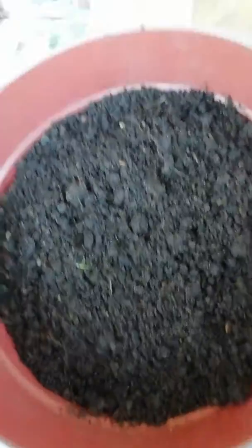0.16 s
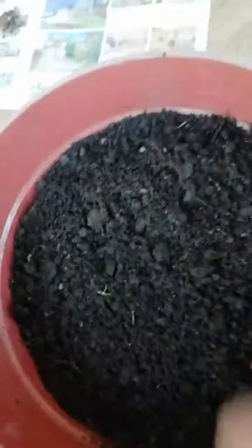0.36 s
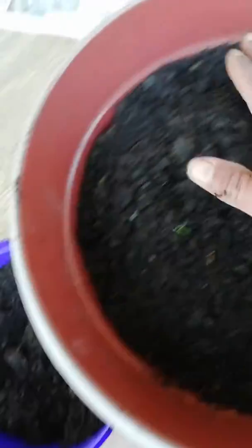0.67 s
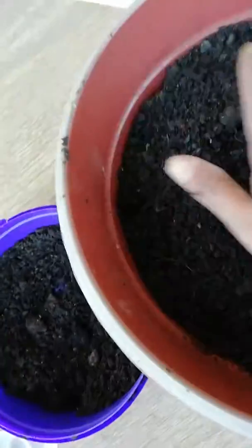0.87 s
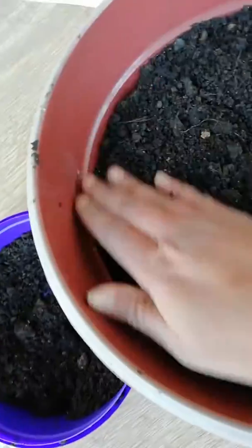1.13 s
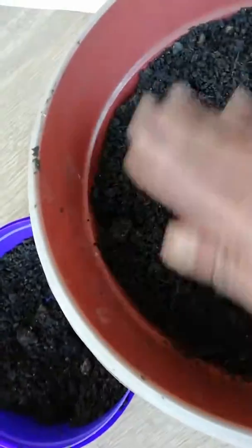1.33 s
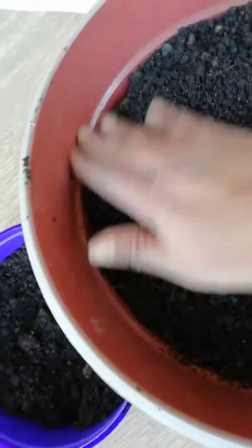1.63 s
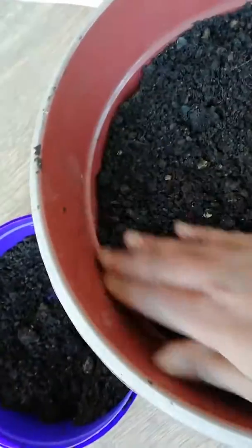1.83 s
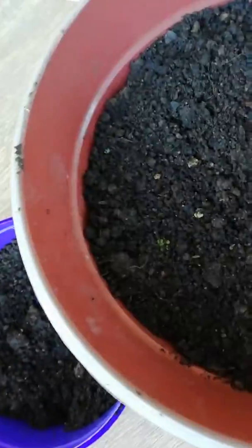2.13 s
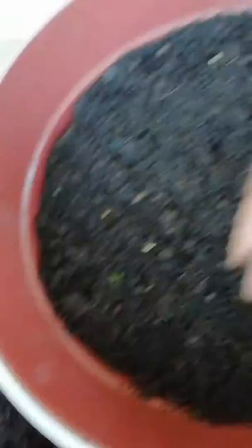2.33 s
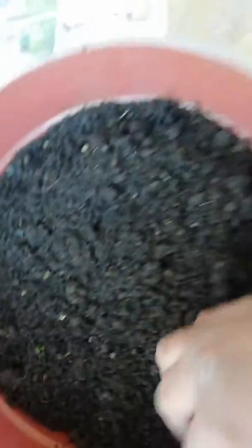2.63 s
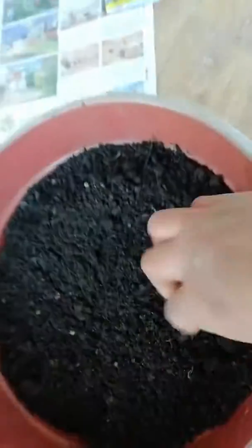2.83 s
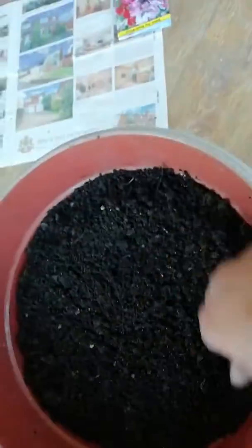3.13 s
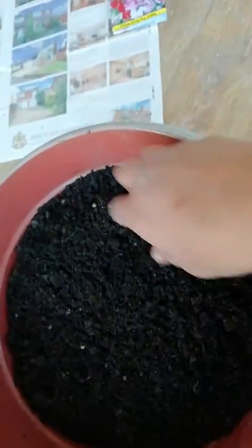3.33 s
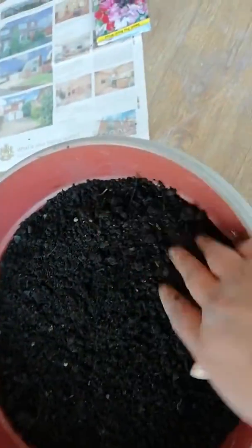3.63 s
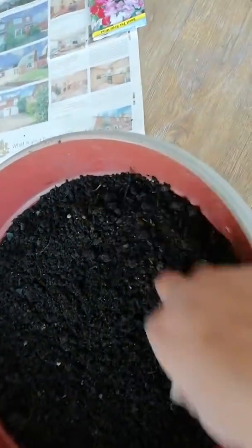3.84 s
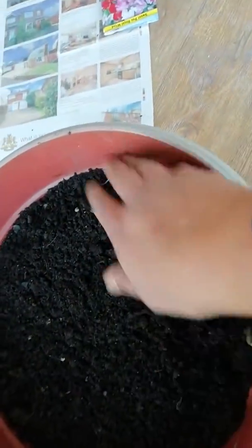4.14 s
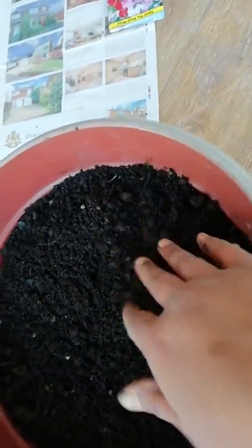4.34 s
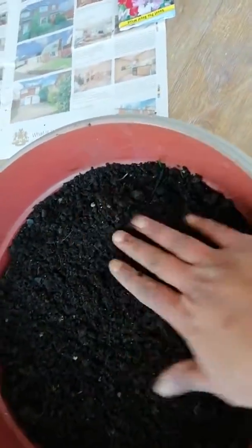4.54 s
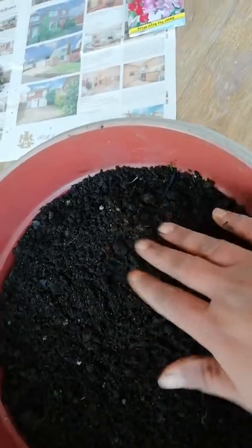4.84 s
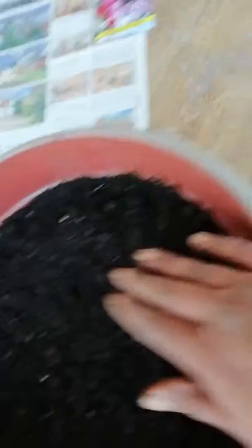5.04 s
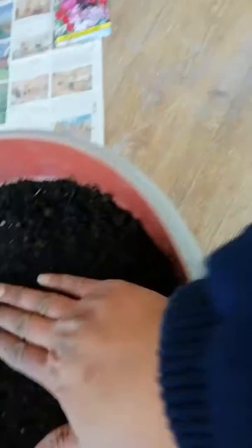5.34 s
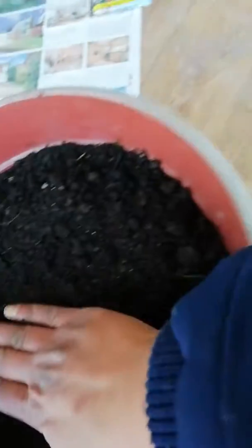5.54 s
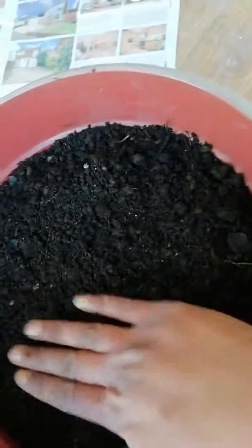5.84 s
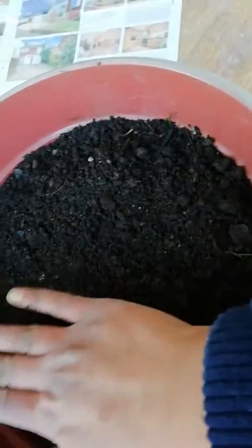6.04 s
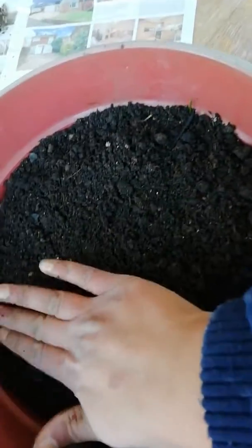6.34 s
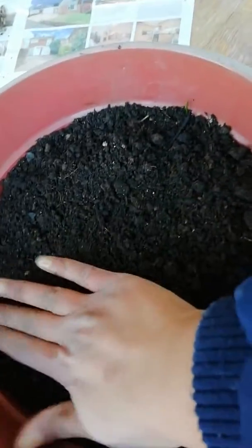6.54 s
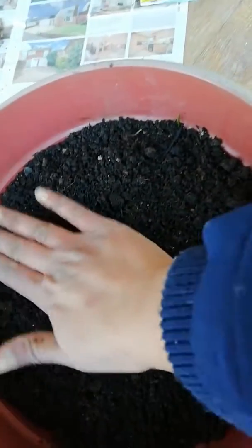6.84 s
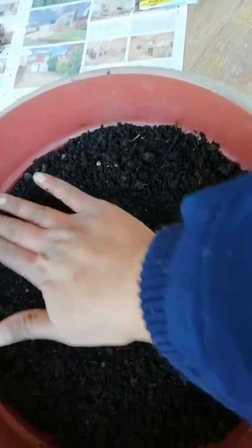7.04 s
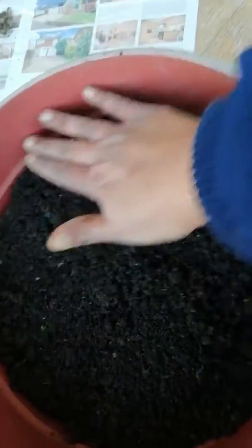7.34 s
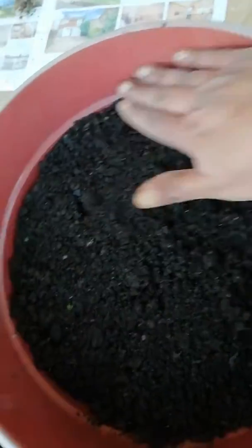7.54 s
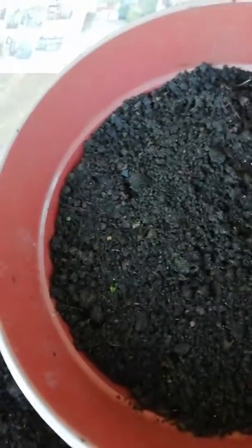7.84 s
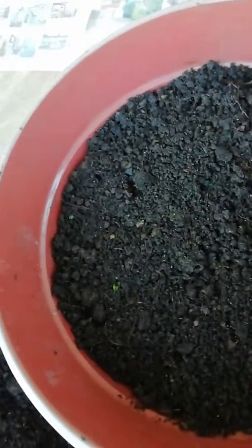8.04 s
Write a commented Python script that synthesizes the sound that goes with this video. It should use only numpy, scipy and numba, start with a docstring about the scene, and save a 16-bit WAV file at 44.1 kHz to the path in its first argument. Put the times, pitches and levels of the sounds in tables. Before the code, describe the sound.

Close up in a small quiet room, fingers sweep loose soil around a plastic pot with soft swishes, gritty wipes and tiny crumb ticks. Around three seconds a short scrape ends in a sharp plastic snap, by far the loudest moment. Fainter rustles follow, then the strokes strengthen near the end. A low engine-like hum wavers behind, over faint hiss.

```python
"""Hands level potting compost in a plastic pot, close to a phone's two microphones in a small room.
Fingers brush soil along the wall and a sleeve swishes: noise of tiny slips, filtered and shaped by strokes.
A gritty scrape ends in a snap of the plastic, a sum of damped modes; soft pats and crumb ticks are noise bursts.
Behind, harmonics make a low hum, like an engine outside, that rises and falls and briefly booms in the room.
Quiet room air, a wavering drone and a faint hiss lie beneath."""
import sys
import numpy as np
from scipy import signal
from scipy.fft import rfft, irfft, next_fast_len
from scipy.io import wavfile
from scipy.ndimage import uniform_filter1d
from numba import njit

SR = 44100
rng = np.random.default_rng(int(sys.argv[2]) if len(sys.argv) > 2 else 0)


def unload_wav(signal):
    """Save mono or channel-first audio to the path in sys.argv[1] as 16-bit WAV at rate SR, clipped to [-1, 1]."""
    wavfile.write(
        sys.argv[1],
        SR,
        np.round(np.clip(np.atleast_2d(signal).T, -1, 1) * 32767).astype(np.int16),
    )


N = 361179
T = np.arange(N) / SR  # time [s]


def amp(db):
    """Decibels to gain."""
    return 10 ** (np.asarray(db) / 20)


def curve(rows):
    """The columns of a table after its time column, joined by straight lines in time."""
    s, *columns = np.transpose(rows)
    return [np.interp(T, s, c) for c in columns]


def colour(x, points, share=1):
    """Filter by (frequency [Hz], level [dB]) points on a log-frequency axis, their decibels times share."""
    size = next_fast_len(N, real=True)
    hz, db = np.transpose(points)
    f = np.maximum(np.fft.rfftfreq(size, 1 / SR), 1)
    gain = amp(share * np.interp(np.log(f), np.log(hz), db))
    return irfft(rfft(x, size) * gain, size)[..., :N]


def band(x, lo_hz, hi_hz, order=3):
    """Band-pass."""
    edges = [lo_hz, min(hi_hz, SR / 2 - 1)]
    return signal.sosfilt(signal.butter(order, edges, "band", fs=SR, output="sos"), x)


def unit(x, lo_hz=20, hi_hz=16000):
    """Scale a stereo pair so that its middle has rms 1 in a band."""
    return x / band(x.mean(axis=0), lo_hz, hi_hz).std()


def walk(rate):
    """A smooth random wander with spread near 1, from about rate random points a second."""
    y = signal.resample(rng.standard_normal(int(rate * N / SR) + 2), 4096)
    return np.interp(T, np.linspace(0, T[-1], len(y)), y)


def ports(pair):
    """Each microphone port gives the sound its own colour."""
    # shape of the left-right difference, shared out below: (frequency [Hz], left minus right [dB])
    port_points = [(150, 12), (500, -4.5), (1000, -4), (2300, -8.5), (3800, -2.5), (5000, -7.5),
                   (6500, -20), (8000, -7.5), (10000, -2.5), (15000, 4.5)]
    return np.array([colour(pair[0], port_points, 0.58), colour(pair[1], port_points, -0.54)])


def add(out, pair, s, db):
    """Place a short stereo sound at a time, its middle peaking at the given level."""
    i = int(s * SR)
    scaled = amp(db) * pair / np.abs(pair.mean(axis=0)).max()
    out[:, i:i + pair.shape[1]] += scaled[:, :N - i]


def stroke(start_s, length_s, swell_db, attack_s, release_s):
    """Gain of one touch: it sets in, swells or eases while the hand travels, and dies away."""
    age = T - start_s
    onset = .5 + .5 * np.tanh(age / (2 * attack_s))
    travel = amp(swell_db * (np.clip(age / length_s, 0, 1) - .5))
    return onset * travel * np.exp(-np.clip((age - length_s) / release_s, 0, 20))


def strokes(rows, attack_s, release_s):
    """Gains of all touches in a table: the main layer, then the layers set relative to it."""
    power = np.zeros((len(rows[0]) - 3, N))
    for s, length_s, db, swell_db, *relative_db in rows:
        first = max(int((s - 10 * attack_s) * SR), 0)
        near = slice(first, int((s + length_s + 10 * release_s) * SR))
        gain = stroke(s, length_s, swell_db, attack_s, release_s)[near]
        layers = amp(db + np.array([0, *relative_db]))
        power[:, near] += np.outer(layers, gain) ** 2
    return np.sqrt(power)


def contact(tables, fade_s=.006):
    """1 during each stroke, 0 between strokes, with quick fades."""
    touching = np.any([(T >= rows[0][0]) & (T <= rows[-1][0]) for rows in tables], axis=0)
    return uniform_filter1d(1. * touching, int(fade_s * SR) + 1)


def gestures(tables):
    """The controls of several strokes in turn; the first becomes a gain, silent between strokes."""
    db, *others = curve([row for rows in tables for row in rows])
    return [amp(db) * contact(tables)] + others


def friction(points, per_s, spread_db, judder_db, patchy_db, apart, lag_s=.0002):
    """Countless tiny slips of unequal size; the contact judders and its colour shifts as it travels."""
    slips = (rng.random((3, N)) < per_s / SR) * rng.standard_normal((3, N))
    slips *= amp(spread_db * np.minimum(rng.exponential(size=(3, N)), 5))
    # the lag between the ports wanders with the hand; scattered sound differs at each
    lag = np.round(lag_s * SR * walk(6)).astype(int)
    left = slips[0, (np.arange(N) + lag) % N]
    pair = np.array([left, slips[0]]) + apart * slips[1:]
    # random patches in frequency and time, alike at both ports
    z = signal.stft(pair, nperseg=512)[2]
    patches = uniform_filter1d(rng.standard_normal(z.shape[1:]), size=5, axis=0)
    patches = uniform_filter1d(patches, size=12, axis=1)
    pair = signal.istft(z * amp(patchy_db * patches / patches.std()))[1][:, :N]
    return ports(colour(pair, points)) * amp(judder_db * walk(70))


@njit
def resonate(x, hz, damping):
    """State-variable band-pass with a moving centre; damping is width over centre."""
    y, b, low = np.empty(len(x)), 0., 0.
    for i in range(len(x)):
        g = np.tan(np.pi * hz[i] / SR)
        v = (b + g * (x[i] - low)) / (1 + g * (g + damping))
        b, low, y[i] = 2 * v - b, low + 2 * g * v, damping * v
    return y


def background():
    """Quiet room air and a drone, alike at both ports in the bass, over a faint even hiss."""
    # still air of the room: (frequency [Hz], level [dB])
    air_points = [(25, -1.5), (50, -6.5), (80, -12), (160, -10), (270, -18.5), (380, -25), (650, -34.5),
                  (950, -29.5), (1500, -30.5), (3100, -35), (4000, -45), (6600, -36), (8000, -50.5),
                  (15000, -44.5)]
    # a wavering drone of the house: (time [s], level [dB])
    drone_levels = [(0, -52), (1.2, -58), (3.4, -59.5), (4.6, -64.5), (7.7, -67), (8.19, -55)]
    drone_hz, drone_width_hz = 121.8, 7.3
    air_db, hiss_db = -73, -75.5
    shared, *own = rng.standard_normal((3, N))
    air = colour(shared + 2.1 * band(np.array(own), 450, 18000, order=1), air_points)
    balance = amp(np.array([[-1.5], [1.5]]))  # the right port is louder
    air = amp(air_db + 0.22 * walk(10)) * unit(air, 504, 1560) * balance
    # narrow noise wavers by itself
    drone = band(rng.standard_normal(N), drone_hz - drone_width_hz / 2, drone_hz + drone_width_hz / 2, order=2)
    drone = amp(curve(drone_levels)[0]) * drone / drone.std()
    return air + drone + amp(hiss_db) * rng.standard_normal((2, N))


def engine(waver_db=2, rumble_db=-12, wall_cutoff_hz=263):
    """Mostly the lowest harmonics pass the walls; an overtone booms as it crosses a room resonance."""
    # the engine: (time [s], firing rate [Hz], fundamental level [dB], overtone level [dB])
    running = [(0, 39.5, -42.5, -61.5), (.15, 42.2, -50.5, -61), (.42, 47.54, -42, -56.5),
               (.6, 48.73, -40.5, -54.5), (1, 50.34, -52.5, -57), (1.3, 51.83, -45, -56.5),
               (1.85, 48.3, -46, -56), (2.12, 38, -51, -68.5), (2.3, 29.9, -51, -63),
               (2.55, 29.5, -50.5, -61.5), (3.6, 27.5, -49, -61.5), (4.55, 26.59, -52, -67),
               (4.84, 33.2, -71, -62), (5.68, 36.34, -52.5, -58), (6.04, 37.07, -56, -62),
               (6.3, 37.9, -60, -52.5), (6.58, 37.9, -64, -57), (6.85, 32.2, -65.5, -64.5),
               (7.2, 31.05, -51, -56), (8.19, 28.34, -57.5, -64)]
    # overtones of the firing, ahead of walls and boom: (multiple, level re overtone level [dB])
    harmonics = [(2, 0.5), (3, -12.5), (4, -15.5), (5, -22), (6, -13.5), (7, -18), (8, -21.5)]
    # low resonances of the room: (frequency [Hz], width [Hz], boost [dB])
    boom_modes = [(174.7, 8.5, 11), (227.2, 5.7, 18), (247.6, 9, 10.5)]
    # noise that swells with the firing rate and overtone level: (frequency [Hz], level [dB])
    rumble_points = [(90, -33.5), (140, -24), (240, 5.5), (330, -4), (600, -5.5), (1400, -4), (3000, -27),
                     (8000, -74)]
    hz, first_db, overtone_db = curve(running)
    phase = 2 * np.pi * np.cumsum(hz * (1 + 0.0064 * walk(29))) / SR
    hum = amp(first_db + waver_db * walk(14)) * np.sin(phase)
    for k, db in harmonics:
        boom = 1 + sum(amp(peak_db) / (1 + (2 * (k * hz - f) / width) ** 2) for f, width, peak_db in boom_modes)
        walls = 1 / np.hypot(1, (k * hz / wall_cutoff_hz) ** 8)
        level = amp(overtone_db + db + 1.7 * walk(13))
        hum = hum + level * boom * walls * np.sin(k * phase)
    rumble = colour(rng.standard_normal(N) + 0.41 * rng.standard_normal((2, N)), rumble_points)
    rumble_gain = amp(overtone_db + rumble_db) * (hz / hz.max()) ** 2
    return np.sqrt(2) * hum + rumble_gain * unit(rumble)  # sqrt(2): levels are rms


def room(x, gap_s=0.0041, rim_hz=2150, rim_db=-3, rim_t60_s=0.54):
    """The small room answers with a short, dull tail; the rim of the pot lingers a little longer."""
    t60_s, level_db, top_hz = 0.4, -12, 6060
    t = T[:int(.7 * SR)]
    noise = rng.standard_normal((2, 2, len(t)))
    walls = band(noise[0], 240, top_hz) * np.exp(-np.log(1000) * t / t60_s)
    rim = band(noise[1], rim_hz - 150, rim_hz + 150, order=2) * np.exp(-np.log(1000) * t / rim_t60_s)
    tail = (walls + amp(rim_db) * rim) * (t > gap_s)
    # fixed energy for each port's tail
    tail *= np.sqrt(2 * top_hz / SR / np.sum(tail ** 2, axis=1, keepdims=True))
    return amp(level_db) * signal.fftconvolve(x, tail, axes=1)[:, :N]


def squeak():
    """A faint, thin, unsteady tone glides mostly down."""
    # (time [s], peak level [dB], frequency [Hz])
    glide = [(3.38, -76, 3650), (3.44, -77, 3550), (3.48, -71, 3400), (3.54, -77, 3000), (3.92, -77, 3100)]
    gain, hz = gestures([glide])
    return gain * np.sin(2 * np.pi * np.cumsum(hz * (1 + .012 * walk(300))) / SR)


def ticks(decay_s=0.0021):
    """A hard crumb ticks on the plastic with a short bright crack of decaying noise."""
    # (time [s], peak ahead of the port colour [dB])
    tick_rows = [(.03, -38.5), (.577, -53), (1.133, -49.5), (1.172, -36), (1.57, -40), (1.621, -49),
                 (1.665, -41), (2.185, -42), (2.527, -44), (6.035, -43.5), (7.175, -32.5)]
    out, t = np.zeros((2, N)), T[:SR // 50]
    cracks = rng.standard_normal((len(tick_rows), 2, len(t)))
    for (s, db), crack in zip(tick_rows, cracks):
        add(out, band(crack * np.exp(-t / decay_s), 940, 15000, order=1), s, db)
    return ports(out)


def pats(decay_s=0.0043, reach=2.07):
    """A finger lands on the soil with a dull, quickly damped puff; reach is band edge over centre."""
    # (time [s], peak ahead of the port colour [dB], centre [Hz])
    pat_rows = [(1.135, -43, 1203), (1.62, -47, 550), (2.162, -44, 890), (2.531, -36, 1662),
                (2.764, -45, 1586), (3.004, -46, 420), (3.005, -52, 1250), (7.168, -38.5, 1050)]
    out, t = np.zeros((2, N)), T[:SR // 16]
    noises = rng.standard_normal((len(pat_rows), 3, len(t)))
    for (s, db, hz), (shared, *own) in zip(pat_rows, noises):
        puff = (shared + .5 * np.array(own)) * np.exp(-t / decay_s)
        add(out, band(puff, hz / reach, hz * reach, order=2), s, db)
    return ports(out)


def hollow(damping=.5):
    """The rub rings the gap under the sliding hand; its pitch moves during the stroke."""
    # one table a stroke: (time [s], level [dB], resonance [Hz])
    gap_strokes = [
        [(1.45, -69, 2500), (1.555, -50, 2560), (1.58, -49, 2560)],
        [(1.7, -71, 1603), (1.76, -53, 1700), (1.82, -50.5, 2643), (1.96, -44, 2598), (2.07, -36, 2650),
         (2.13, -50, 2300)],
        [(7.18, -57, 1550), (7.235, -63, 616), (7.27, -66.5, 640), (7.33, -47, 1370), (7.36, -67, 1740),
         (7.42, -54, 2620), (7.48, -49.5, 3143), (7.53, -52, 3540), (7.615, -44, 3796), (7.67, -63, 3330)],
    ]
    gain, hz = gestures(gap_strokes)
    flat = [(500, 0), (4000, 0)]
    rub = friction(flat, per_s=6800, spread_db=-2.0, judder_db=1.5, patchy_db=4.5, apart=0.98)
    ring = np.array([resonate(resonate(side, hz, damping), hz, damping) for side in rub])
    # a higher resonance is wider and gathers more of the rub
    return gain * unit(ring / np.sqrt(hz))


def scrape():
    """Knuckles bite into grit on the wall and grind on, then it trickles off; crumbs settle just before."""
    # grinding grit: (frequency [Hz], level [dB])
    grind_points = [(290, -59.5), (500, -19), (728, -7), (972, -13), (1730, 12), (1940, 6), (2180, 12.5),
                    (3370, 3), (4240, -2.5), (6270, 1), (7670, -11.5), (14900, -12), (15800, -32)]
    # crumbs settling: (time [s], length [s], level [dB], swell [dB])
    crumb_rows = [(3.004, 0.0025, -39, -16), (3.037, 0.047, -52, -13)]
    # colour of the crumbs: (frequency [Hz], level [dB])
    crumb_points = [(120, -29), (200, -4), (357, 3.5), (570, -8.5), (1850, -3.5), (2130, -4.5), (4390, -17),
                    (6650, -18), (10600, -22.5), (15000, -22)]
    start_s, bite_length_s, drag_length_s, trickle_s = 3.12, 0.0079, 0.064, 0.056
    bite_db, drag_db = -33.5, -39.5
    grind = friction(grind_points, per_s=12000, spread_db=1.5, judder_db=.6, patchy_db=1, apart=.6)
    settle = friction(crumb_points, per_s=5000, spread_db=2, judder_db=1.2, patchy_db=1.5, apart=.6)
    bite = amp(bite_db) * stroke(start_s, bite_length_s, swell_db=-3, attack_s=0.0035, release_s=0.0038)
    drag = amp(drag_db) * stroke(start_s, drag_length_s, swell_db=-1.5, attack_s=0.004, release_s=trickle_s)
    crumb_gain = strokes(crumb_rows, attack_s=0.0011, release_s=0.033)
    return (bite + drag) * unit(grind) + crumb_gain * unit(settle)


def snaps(reach_octaves=0.28, lag_s=.00006):
    """The plastic flexes and snaps; the soil damps its modes within milliseconds."""
    # (time [s], peak ahead of the port colour [dB], where the contact drives the wall hardest [Hz])
    snap_rows = [(1.946, -26.5, 3150), (2.8236, -45.5, 3350), (2.894, -49, 3527), (3.005, -24, 2188),
                 (3.038, -34, 3752), (3.1273, -32, 2200), (3.187, -10, 3430), (3.188, -16, 5200),
                 (3.1943, -24, 2500), (3.198, -25.5, 2300), (3.496, -48, 2005), (4.128, -42, 2596),
                 (4.187, -44, 2900)]
    # modes of the pot wall: (frequency [Hz], level [dB], t60 [s])
    wall_modes = [(1170, -17, 0.017), (1640, -1, 0.0127), (2270, 9, 0.0075), (3150, -12, 0.029),
                  (3330, 5, 0.0046), (4540, 7.5, 0.0041), (5130, 5, 0.0067), (6370, -3, 0.012)]
    out, t = np.zeros((2, N)), T[:SR // 20]
    hz, db, t60 = np.transpose(wall_modes)[:, :, None]
    age = np.maximum(t - np.array([lag_s, 0])[:, None, None], 0)  # the left port hears it later
    chances = rng.standard_normal((len(snap_rows), len(hz), 1))
    for (s, peak_db, centre_hz), chance in zip(snap_rows, chances):
        drive = amp(db) / (1 + (np.log2(hz / centre_hz) / reach_octaves) ** 4)
        detuned_hz = hz * (1 + 0.0068 * chance)
        ring = np.sin(2 * np.pi * detuned_hz * age) * np.exp(-np.log(1000) * age / t60)
        add(out, band((drive * ring).sum(axis=1), 1680, 12000, order=2), s, peak_db)
    return ports(out)


def swishes():
    """Sleeve and palm slide softly over loose soil, which rustles lower when they press."""
    # (time [s], length [s], cloth hiss [dB], swell [dB],
    #  then re cloth: low rustle [dB], mid rustle [dB], fine hiss [dB])
    swish_rows = [(.06, 0.07, -57.5, 1, -3.5, -3.5, -18), (.175, .18, -45.5, -1.5, -4.5, -3.5, -14),
                  (.41, 0.35, -65.5, -5, -3.5, -2.5, -13), (.775, .2, -51, -6.5, -12.5, -2, -7.5),
                  (.98, 0.079, -62, -7, 1, 7, -12), (1.41, 0.089, -68, -4, 1.5, 5, -12),
                  (1.505, 0.027, -52.5, 6, -8.5, -4, -20), (3.83, 0.1, -64, -5, -8, -5, -15),
                  (3.98, .06, -71, 0, -8, -4, -16), (4.28, .08, -71, -4, -10, -17, -17),
                  (4.51, 0.076, -70, 2, -8, -1.5, -14), (4.87, 0.063, -65.5, -2.5, 2, -1, -16),
                  (5.04, 0.15, -70, -1, -1, -9, -19), (5.27, 0.048, -67, 6, -6, -4, -14),
                  (5.5, 0.099, -66.5, -7, 3, 4, -14), (6.04, 0.077, -66, -2, -7, 2, -9),
                  (6.69, 0.082, -60, -3, -6.5, -2.5, -13), (6.93, 0.13, -58, -1, -6.5, 2, -16),
                  (7.07, 0.087, -48.5, 4, -11.5, -1, -13.5), (7.2, 0.15, -55.5, 2, -3, -3, -6),
                  (7.935, 0.18, -52.5, -7.5, -11, -4.5, -9), (8.15, 0.041, -60.5, 0, -14, -4.5, -10)]
    # (frequency [Hz], level [dB])
    swish_points = [(180, -37), (300, -14.5), (602, -21.5), (723, -17.5), (1060, -11.5), (1190, -8),
                    (1660, -6), (1860, -3.5), (3210, -5), (3920, -11.5), (6240, 3), (7010, 3),
                    (9140, -13.5), (14800, -13), (15800, -13.5)]
    gain, low_gain, mid_gain, hiss_gain = strokes(swish_rows, attack_s=0.025, release_s=0.031)
    rub = friction(swish_points, per_s=8000, spread_db=1.3, judder_db=0.16, patchy_db=1.97, apart=1.0)
    low = unit(band(rub, 356, 1413), 500, 3000)
    mid = unit(band(rub, 1360, 4010), 1640, 3800)
    cloth = unit(band(rub, 4360, 9600), 4500, 6550)
    hiss = unit(band(rub, 9630, 17600), 10500, 15180)
    return gain * cloth + low_gain * low + mid_gain * mid + hiss_gain * hiss


def wipes():
    """Fingers sweep soil along the wall: pressure rings the plastic, fast light contact hisses."""
    # (time [s], length [s], gritty rub [dB], swell over the stroke [dB],
    #  fine hiss re rub [dB], wall ring re rub [dB])
    wipe_rows = [(1.17, 0.08, -50.5, -1.5, -6, 0), (1.545, 0.025, -46.5, -5, -16, -8),
                 (1.598, 0.02, -53, 1, -9, 1), (1.662, 0.064, -54, -4, -3, -4),
                 (1.705, .3, -43.5, 7, -5.5, -6), (2.01, 0.11, -37, 1.5, -8.5, -9),
                 (2.14, 0.03, -56, 14, -8, 2), (2.526, 0.016, -51, 6, -10, -0.5),
                 (2.565, 0.11, -41, -2.5, -7.5, -5), (2.69, 0.093, -57, -7, -10, -0.5),
                 (3.495, 0.08, -58, -2, -8, 0), (3.575, 0.075, -51.5, -2, -9, -4.5),
                 (3.685, 0.04, -55.5, -3, -8, -4), (4.13, 0.088, -70, 2, -7, 2),
                 (4.82, 0.031, -68.5, 0, -10, -2), (5.02, 0.014, -59, 0, -19, -4.5),
                 (5.24, 0.051, -58.5, -2, -6, -3.5), (5.49, .05, -64.5, -7, -5, -4),
                 (5.975, 0.072, -61.5, -2, -11, -2), (6.158, .038, -59.5, 2, -8, 4),
                 (7.365, 0.17, -57.5, -7, -8, 1.5), (7.472, .11, -52.5, 3, -1, -3),
                 (7.585, .075, -44.5, -5, -3, -4.5), (7.67, 0.15, -55.5, -2.5, -9, -2.5)]
    # (frequency [Hz], level [dB])
    wipe_points = [(290, -48), (500, -3), (866, -18), (1350, -12.5), (2120, -11), (2450, -3), (3000, -4.5),
                   (3270, 1.5), (4060, -6.5), (6360, -3.5), (9120, -14.5), (10100, -5.5), (11200, -8),
                   (14700, -2), (15800, -8)]
    gain, hiss_gain, wall_gain = strokes(wipe_rows, attack_s=0.0064, release_s=0.013)
    rub = friction(wipe_points, per_s=9000, spread_db=-0.5, judder_db=0.66, patchy_db=3.1, apart=1.0)
    wall = unit(band(rub, 1180, 2750, order=2), 1000, 4400)
    grit = unit(band(rub, 4550, 7360), 4000, 6660)
    hiss = unit(band(rub, 7000, 27000), 11600, 14100)
    return gain * grit + wall_gain * wall + hiss_gain * hiss


def scene():
    """The work at the pot, its echo in the room, the engine and the background."""
    work = wipes() + swishes() + hollow() + scrape() + squeak() + pats() + snaps() + ticks()
    return work + room(work) + engine() + background()


def record(dry):
    """The phone cuts the top with a steep low-pass."""
    top_hz = 15850
    return signal.sosfilt(signal.ellip(10, .2, 70, top_hz, fs=SR, output="sos"), dry)


dry = scene()
out = record(dry)
unload_wav(out)
```